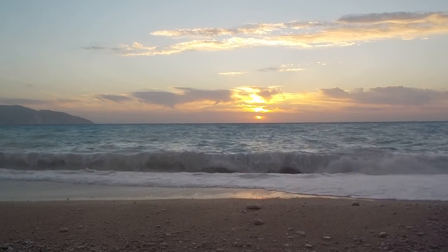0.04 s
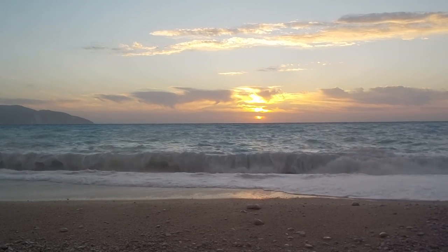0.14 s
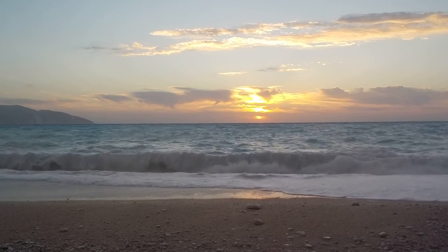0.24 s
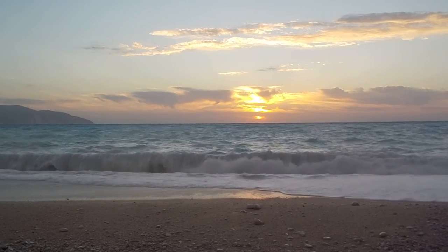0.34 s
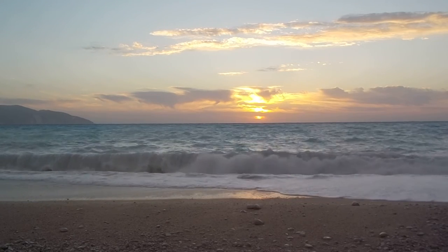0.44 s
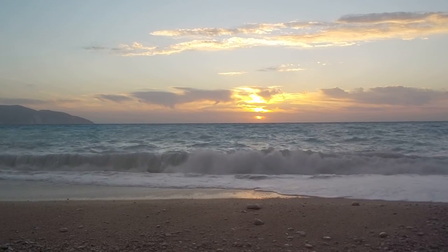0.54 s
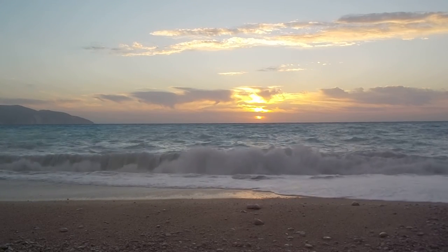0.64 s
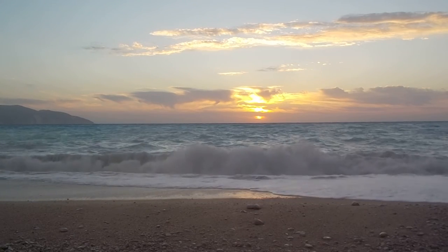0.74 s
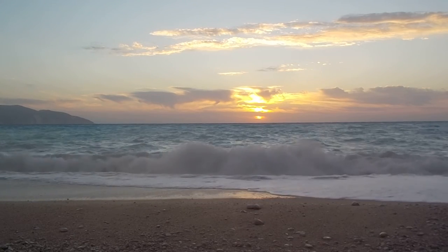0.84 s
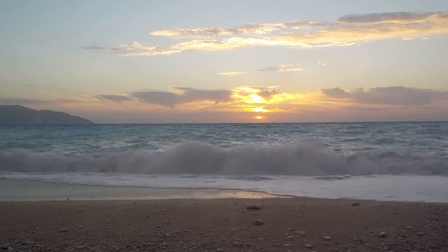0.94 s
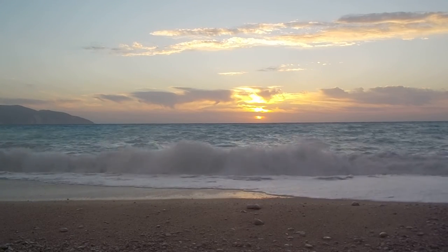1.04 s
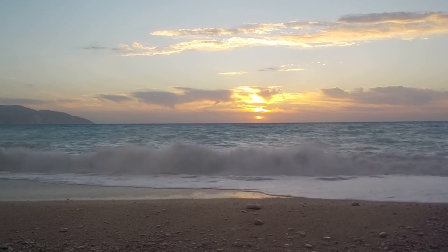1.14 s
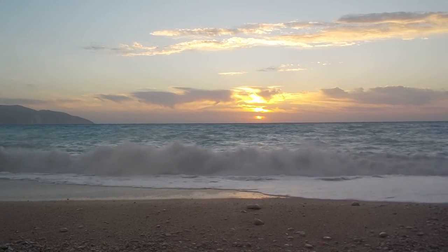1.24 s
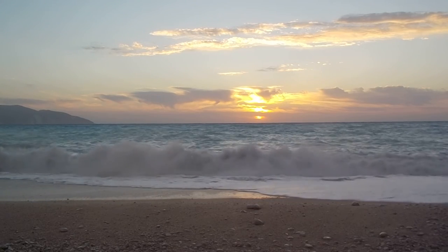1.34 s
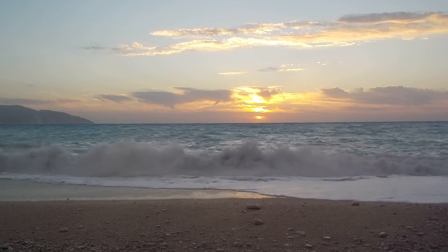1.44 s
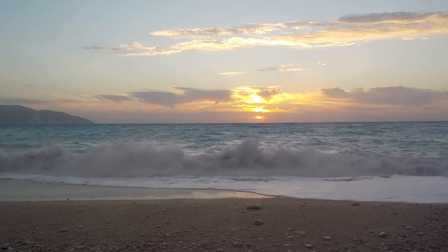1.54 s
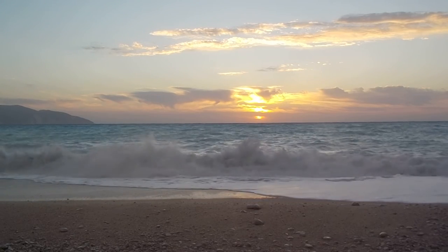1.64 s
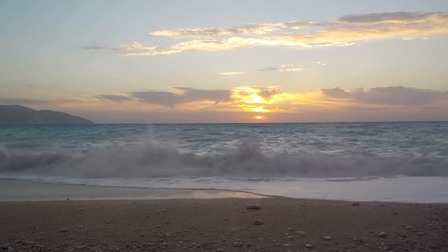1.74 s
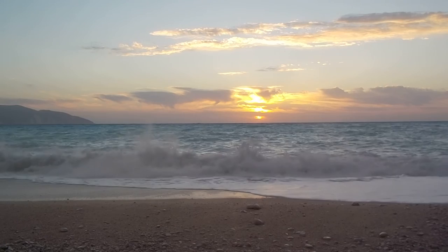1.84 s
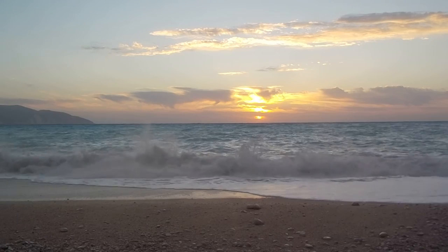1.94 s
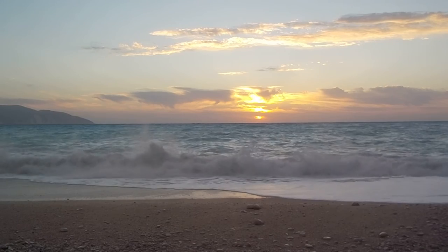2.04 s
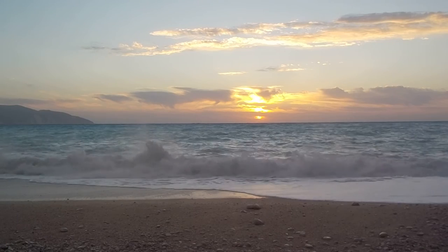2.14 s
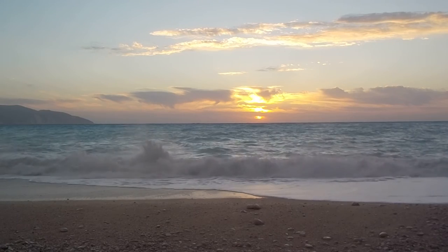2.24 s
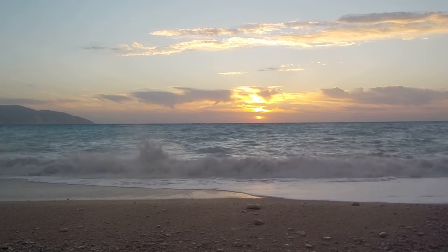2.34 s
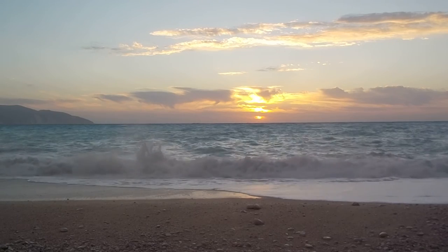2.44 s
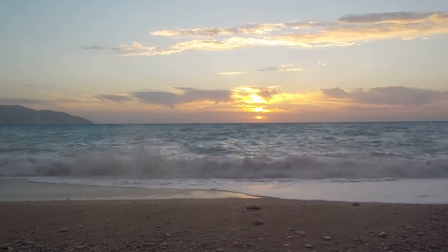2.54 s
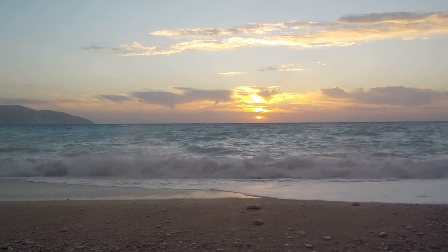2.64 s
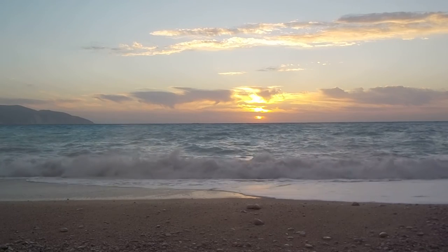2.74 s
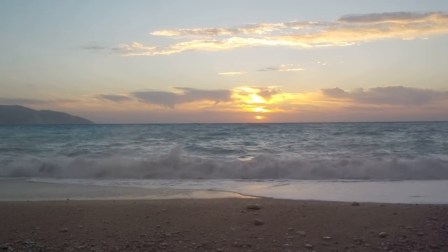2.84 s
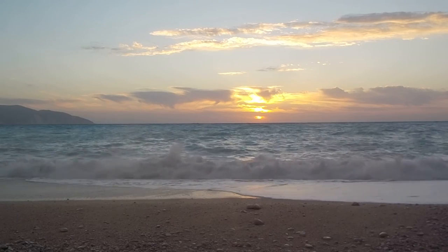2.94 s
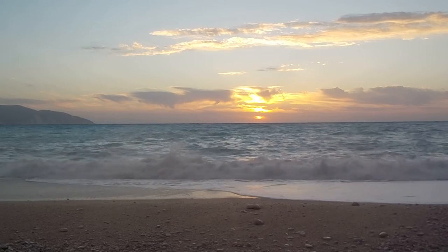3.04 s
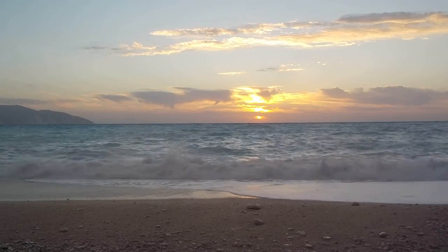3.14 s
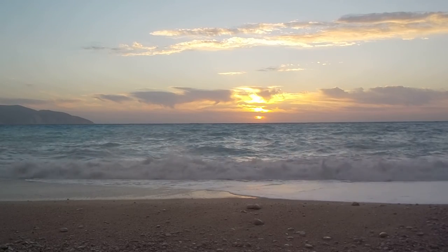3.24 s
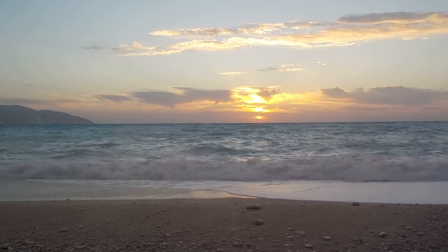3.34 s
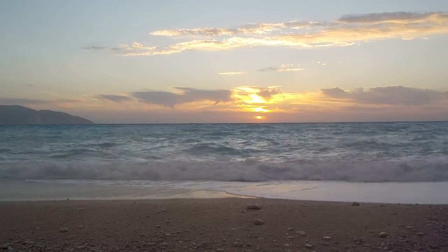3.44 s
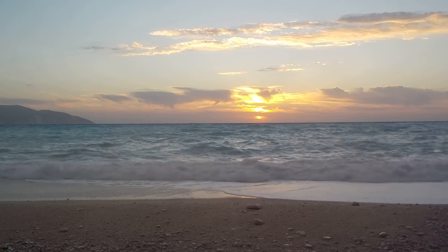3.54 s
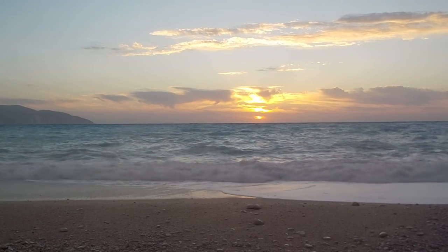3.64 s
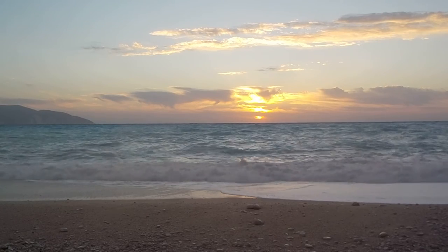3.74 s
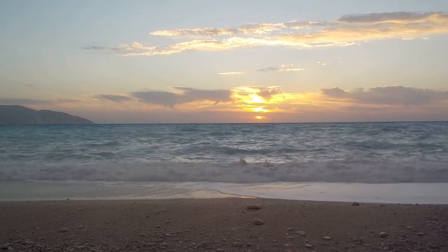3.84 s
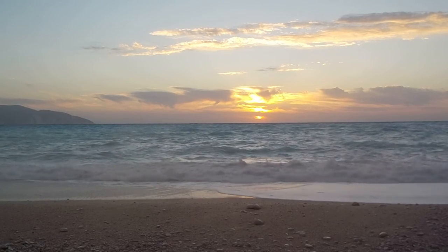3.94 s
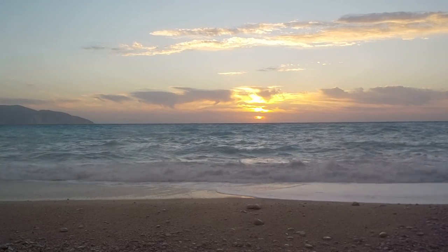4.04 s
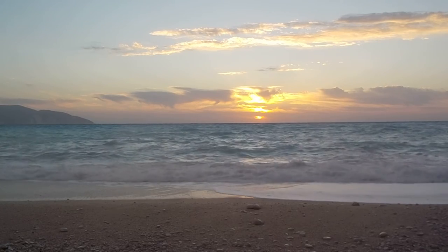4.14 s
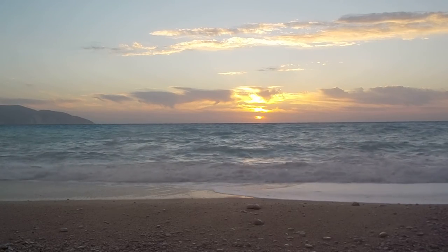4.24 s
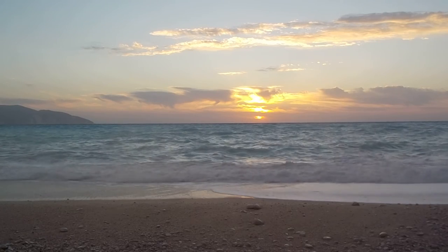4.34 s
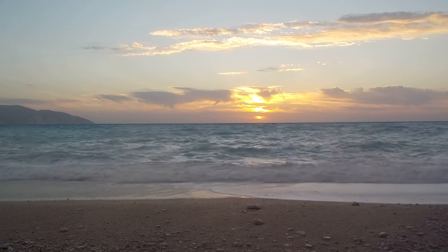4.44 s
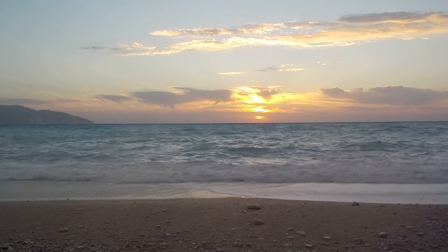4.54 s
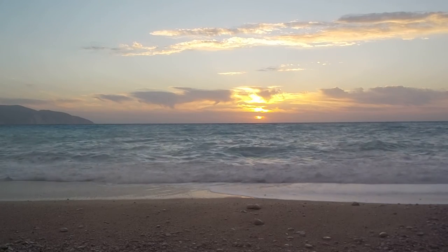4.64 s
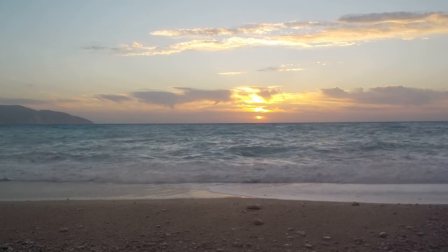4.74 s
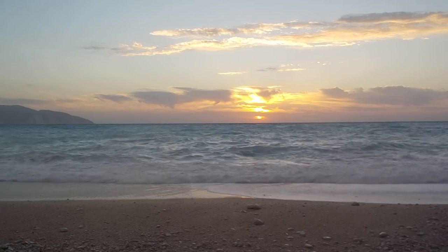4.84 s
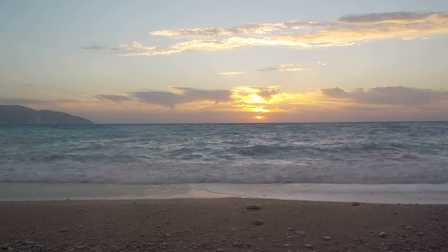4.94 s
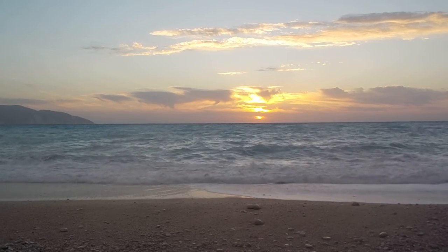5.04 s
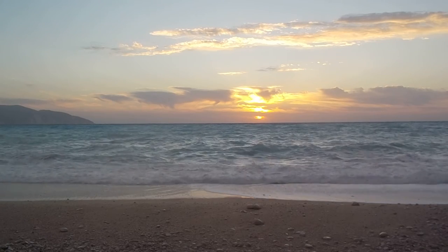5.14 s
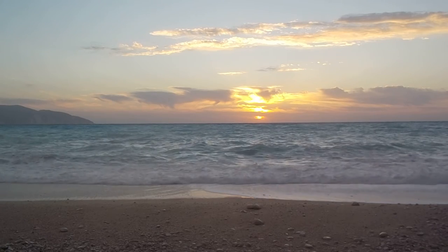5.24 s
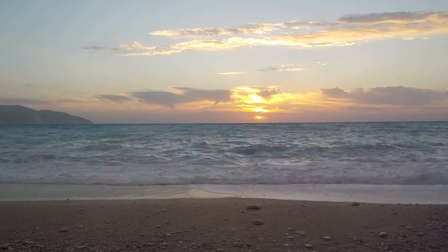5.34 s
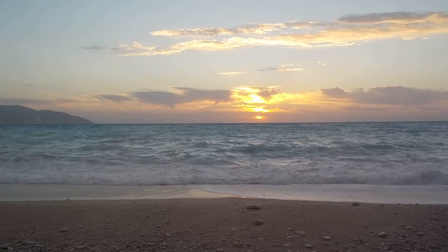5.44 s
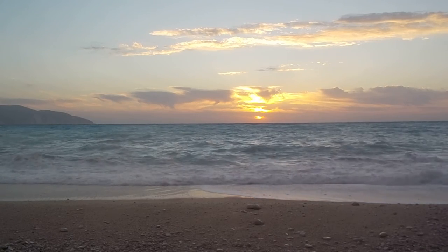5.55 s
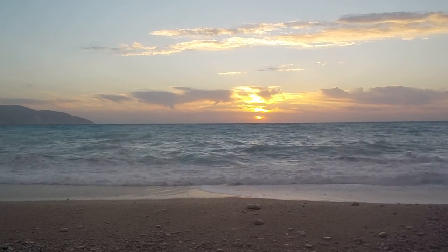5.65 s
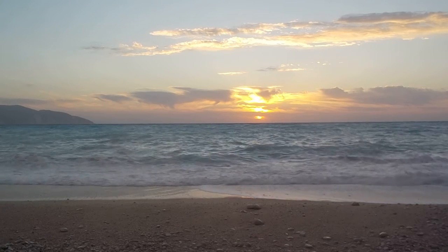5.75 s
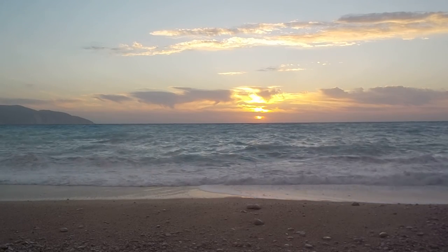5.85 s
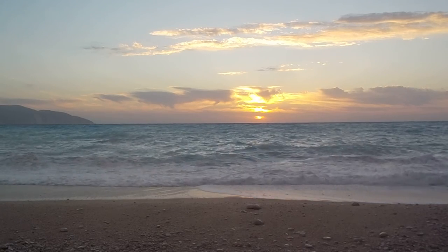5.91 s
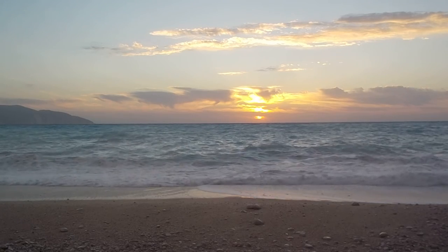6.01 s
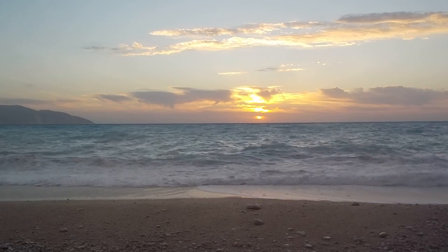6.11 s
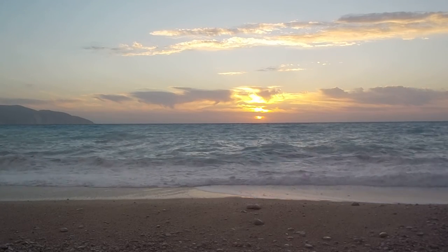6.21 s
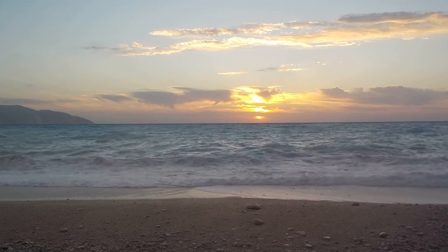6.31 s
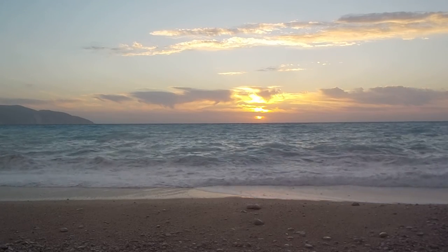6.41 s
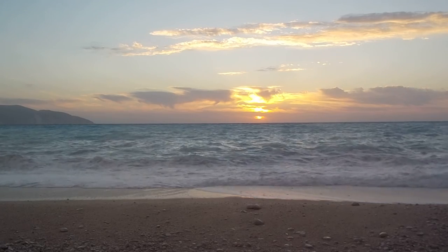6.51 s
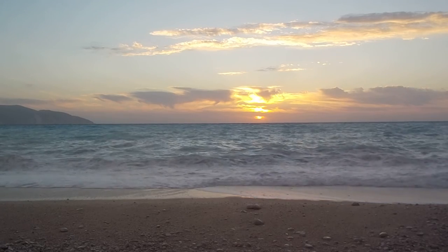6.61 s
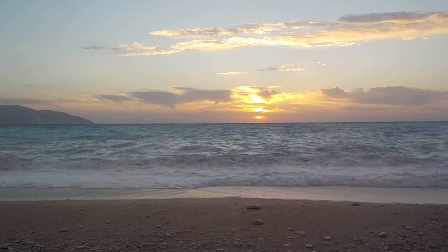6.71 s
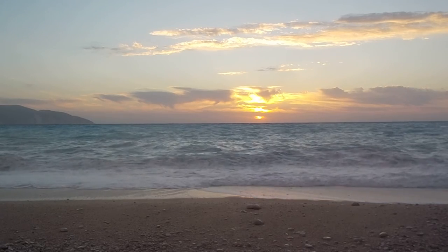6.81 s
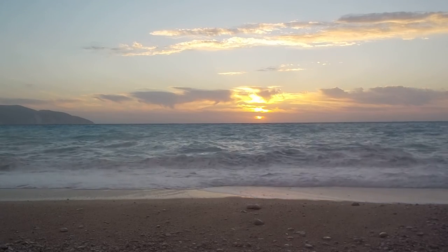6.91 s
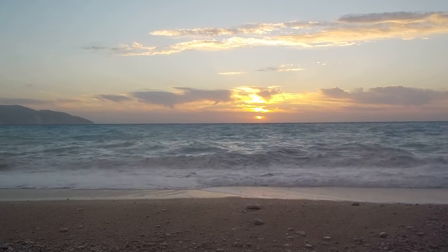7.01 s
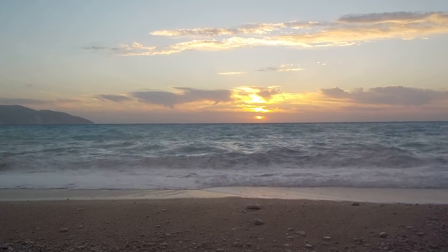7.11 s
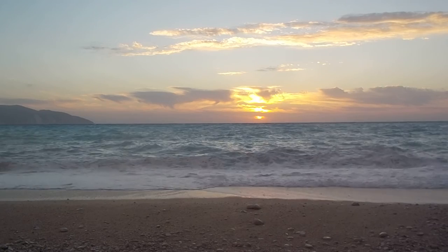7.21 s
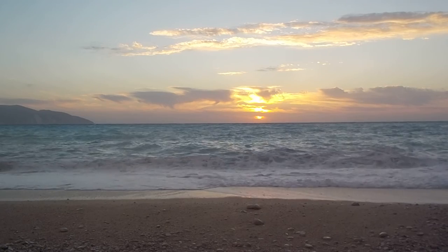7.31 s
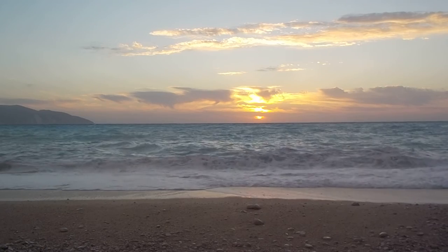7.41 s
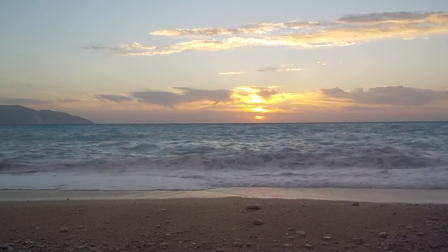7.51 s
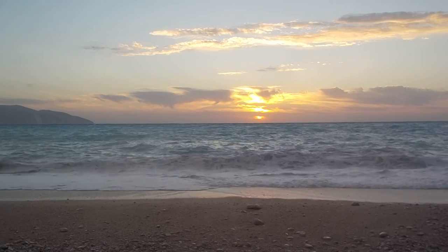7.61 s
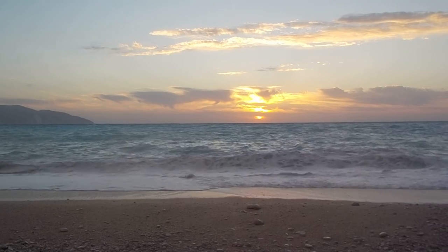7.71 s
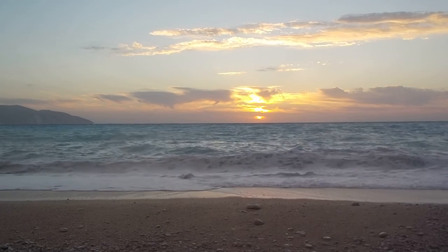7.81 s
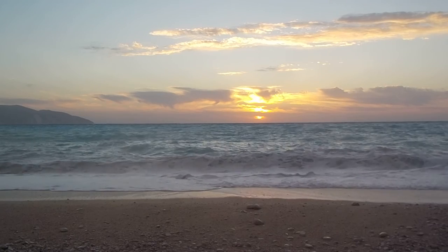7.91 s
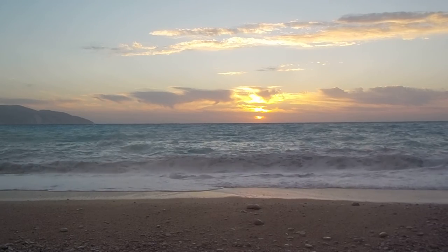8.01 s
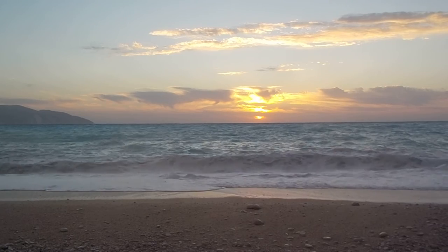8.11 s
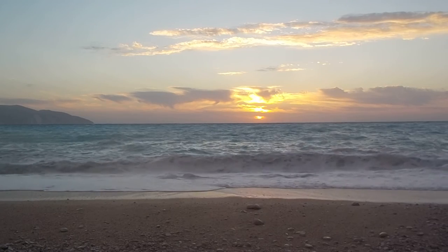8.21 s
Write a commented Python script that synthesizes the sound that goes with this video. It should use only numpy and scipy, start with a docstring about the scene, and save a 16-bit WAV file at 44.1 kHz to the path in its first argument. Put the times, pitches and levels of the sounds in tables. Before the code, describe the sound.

A wave breaks on a pebble beach with roaring, fizzing surf and rattling shingle, while hard wind gusts pop and flap on the microphone.

```python
"""A wave breaks on a pebble beach while hard gusts pop and flap on the two ports of a small camera.
Its churning water rumbles, bubbles ring and fizz, and knocking stones blur into a hiss.
From 1.3 s a second surge swells and dies away slowly, a third joins it, and softer gusts return around 3 to 5 s.
The rumble sinks near 5.7 s, then two smaller waves rake the shingle.
Water and stones are filtered noise, ringing clicks and dry clicks; the housing cuts notches into everything."""
import sys
import numpy as np
from scipy import signal
from scipy.fft import rfft, irfft, next_fast_len
from scipy.io import wavfile
from scipy.ndimage import uniform_filter1d

SR = 44100
rng = np.random.default_rng(int(sys.argv[2]) if len(sys.argv) > 2 else 0)


def dump_mix(stems):
    """Bounce the given channels to the path in sys.argv[1] as a 16-bit WAV at rate SR."""
    frames = np.atleast_2d(stems).T  # one column per channel
    limited = np.clip(frames, -1, 1)  # hard clip at full scale
    pcm = np.round(limited * 32767).astype(np.int16)
    wavfile.write(sys.argv[1], SR, pcm)


N = 364707


def from_db(db):
    """Decibels to gain."""
    return 10 ** (np.asarray(db) / 20)


def rms_one(x):
    """Scale to an rms of 1."""
    return x / np.sqrt(np.mean(x ** 2) + 1e-20)


def at_hz(points, hz, axis=1):
    """One column of a table, read on a log-frequency axis."""
    points = np.array(points)
    return np.interp(np.log(hz + 1e-9), np.log(points[:, 0]), points[:, axis])


def filtered(x, response):
    """Pass x through a response given as a function of Hz."""
    size = 2 * next_fast_len(N // 2 + 4096)
    hz = np.arange(size // 2 + 1) * SR / size
    return irfft(rfft(x, size) * response(hz), size)[..., :N]


def coloured(x, spectrum, axis=1):
    """Give x the tone colour of a spectrum table; rms 1."""
    return rms_one(filtered(x, lambda hz: from_db(at_hz(spectrum, hz, axis=axis))))


def drift(rate):
    """Smooth chance that changes about `rate` times a second; spread 1."""
    step = 40   # samples between the slow values
    settle = 2000   # slow values dropped while the filter settles
    r = np.exp(-2 * np.pi * rate * step / SR)
    noise = rng.standard_normal(N // step + settle + 2)
    slow = signal.lfilter([1], [1, -2 * r, r * r], noise)[settle:]
    return np.interp(np.arange(N) / step, np.arange(len(slow)), rms_one(slow))


def grains(per_s, spread_db):
    """Two unrelated streams of random clicks, many small and few large."""
    sizes = from_db(spread_db * np.minimum(rng.exponential(1, (2, N)), 5))
    signs = rng.choice([-1, 1], (2, N))
    return sizes * signs * (rng.random((2, N)) < per_s / SR)


# Gusts on the ports. Each row: start in seconds, end in seconds, left level in dB, right level in dB,
# before the wander and the mix trim.
GUST_TIMES = [(0.0, 0.035, -17.5, -22), (0.157, 0.193, -24.5, -29), (.385, .415, -23.5, -28),
              (.486, 0.511, -23, -22.5), (0.582, 0.622, -24.5, -31), (0.629, 0.691, -23, -25),
              (.704, 0.739, -23, -16.5), (.754, 0.786, -24, -18), (0.783, 0.803, -20.5, -18),
              (0.81, 0.857, -19.5, -16.5), (.862, 0.892, -23, -29), (0.898, 0.926, -26, -15),
              (1.062, 1.081, -21.5, -26), (1.091, 1.116, -16, -30), (1.125, 1.159, -24.5, -23),
              (1.283, 1.323, -26.5, -18), (1.329, 1.352, -32, -22), (1.923, 1.964, -31.5, -32),
              (2.827, 2.959, -48, -37.5), (3.038, 3.139, -36.5, -33), (3.488, 3.522, -41, -30.5),
              (3.726, 3.84, -28, -33.5), (3.856, 4.098, -32, -34.5), (4.12, 4.293, -31.5, -40),
              (4.295, 4.412, -27, -35), (4.418, 4.49, -30, -30.5), (4.493, 4.593, -41, -36.5),
              (4.596, 4.654, -29, -32), (5.082, 5.232, -41, -36)]
GUST_EDGE_SHARE = 0.065   # a gust builds and fades over this share of its length
GUST_SWING_DB, GUST_SWINGS_PER_S = 2.2, 29


def gust_force():
    """The push of the air on each port: short gusts snap in, long ones swell and fade, and all wander."""
    power, t = np.zeros((2, N)), np.arange(N) / SR
    for start, end, left_db, right_db in GUST_TIMES:
        edge_s = max(GUST_EDGE_SHARE * (end - start), 1e-3)
        blowing = np.maximum(np.tanh((t - start) / edge_s) - np.tanh((t - end) / edge_s), 0) / 2
        power += from_db([[left_db], [right_db]]) ** 2 * blowing
    wander = np.array([drift(GUST_SWINGS_PER_S), drift(GUST_SWINGS_PER_S)])
    return np.sqrt(power) * from_db(GUST_SWING_DB * wander)


# The ports' answer to turbulence. Each row: frequency in Hz, left and right relative level in dB.
BUFFET_COLOUR = [(25, -39, -23), (78, -37, -31), (140, -14, -9.5), (220, 1, 5), (500, 10, 10), (855, 3, 12),
                 (1127, 7, -10), (1480, -29, -27), (2520, -19, -39), (6000, -75, -65)]


def turbulence(soft_hz, flutter_db):
    """Eddies at each port, softened above soft_hz: fluttering, then evened out to a steady rms of 1."""
    left = coloured(rng.standard_normal(N), BUFFET_COLOUR, axis=1)
    right = coloured(rng.standard_normal(N), BUFFET_COLOUR, axis=2)
    softener = signal.butter(1, min(soft_hz, SR / 3), fs=SR, output="sos")
    eddies = signal.sosfilt(softener, np.array([left, right]))
    eddies = eddies * from_db(flutter_db * np.array([drift(85), drift(83)]))
    running_power = uniform_filter1d(eddies ** 2, size=SR // 45)
    return eddies / np.sqrt(running_power + 1e-12)


def wind(force, hard_db, level_db):
    """Each port has its own gusts: weak ones are dull, hard ones reach higher."""
    hard = force ** 2 / (force ** 2 + from_db(hard_db) ** 2)   # share of small, fast eddies
    bright = turbulence(soft_hz=3040, flutter_db=0.0)
    dull = turbulence(soft_hz=85, flutter_db=1.5)
    return from_db(level_db) * force * (np.sqrt(hard) * bright + np.sqrt(1 - hard) * dull)


def eddy(hz, length_s, lopsided, unsteady):
    """An eddy swings the air in each port for a few uneven cycles, harder one way, around its middle."""
    t = np.arange(-(SR // 50), SR // 50) / SR
    glide, turn = rng.standard_normal((2, 2, 1))   # random pitch glide and phase for each port
    along = t / max(length_s, 1e-3)
    pitch = hz * np.exp(unsteady * glide * np.tanh(along))
    swing = np.exp(-2 * along ** 2) * np.sin(2 * np.pi * (np.cumsum(pitch, axis=1) / SR + turn))
    return swing + lopsided * (swing ** 2 - np.exp(-4 * along ** 2) / 2)


# The hardest eddies pop or flap on a port. Each row: middle in seconds, left and right level in dB
# before trim, port filter and choking, pitch in Hz, length in seconds.
HARD_POPS = [(.006, -5, -18, 775, 0.004), (.0105, -15, -18, 1360, 0.0024), (0.013, -17, -4.5, 797, 0.0028),
             (0.0204, -15, -9, 712, 0.0054), (0.031, -4.5, -23, 977, 0.0025),
             (.036, -7.5, -26, 1148, 0.0016), (.0452, -11.5, -26, 694, 0.0027),
             (0.129, -6.5, -27, 600, 0.0011), (0.1463, -22, -6.5, 600, 0.0013),
             (0.17, -17, -24, 542, 0.0034), (0.182, -9, -26, 600, .0017), (.1896, -11, -25, 659, 0.0017),
             (0.392, -21, -26, 540, 0.0036), (0.397, -12, -23, 747, 0.001), (0.407, -9, -14, 583, 0.0017),
             (0.4094, 3.5, -26, 820, 0.0011), (0.4872, -11, -14, 723, .0017), (0.493, -10, -23, 771, 0.005),
             (0.4946, -12, -8, 746, .0017), (.5004, -15, -2, 701.5, 0.0023),
             (.5022, -17, -15, 1397, 0.0022), (.509, -9, -8, 654, 0.0018), (.5915, -7, -15, 900, 0.0031),
             (.5968, -6.5, -25, 827, 0.0026), (0.6157, -15, -7, 665, 0.002),
             (0.621, -6.5, -24, 806, 0.0033), (0.637, -12, -21, 500, 0.0026),
             (0.6487, -8, -12, 650, 0.0014), (.6516, -26, -2, 701, .0016), (0.678, -10, -19, 578, 0.0022),
             (0.6853, -4.5, -10, 704, 0.0012), (0.722, -23, -10, 597, 0.0038), (.7302, -5, -5, 600, 0.0018),
             (.76, -20, -7, 567, 0.0019), (0.7646, -27, -8, 455, 0.0022), (.7877, -8, -10, 426, 0.0042),
             (.7906, -11, -7.5, 564, 0.0052), (0.8034, -6, -18, 807, 0.002), (0.81, -4, -21, 563, 0.002),
             (0.817, -15, -9, 578, .0015), (0.824, -14, -11, 666, 0.0052), (.8344, -7, -5.5, 600, 0.0013),
             (.8405, -17, -18, 584, 0.0046), (.8443, -5, -10, 633, 0.0015),
             (0.8528, -8.5, -17, 655, 0.0029), (0.8553, -20, -2, 687, 0.0014), (0.871, -6, -13, 551, .0017),
             (0.896, -10, -15, 600, .0016), (0.9096, -3.5, -12, 694, 0.0023),
             (0.9157, -20, -2, 723, 0.0019), (.9238, -20, -14, 610, 0.0016), (0.954, -12, -33, 630, 0.0023),
             (1.0717, -11, -16, 825, 0.007), (1.0785, -11, -12, 630, 0.0032),
             (1.0858, 2.5, -24, 842, 0.0023), (1.101, -11, -25, 777, .0018), (1.1078, -1, -24, 868, 0.0022),
             (1.1232, -4, -23, 563, .0015), (1.1334, -19, -5, 713, 0.0012),
             (1.1394, -23, -1.5, 693, 0.0023), (1.143, -4, -25, 600, 0.0013), (1.148, -8, -7, 540, .0014),
             (1.15, -11, -18, 562, 0.0037), (1.163, -20, -8, 521, 0.0011), (1.294, -10, -6, 450, 0.0038),
             (1.302, -4, -10, 674, 0.0013), (1.3046, -17, 1, 525, 0.0021), (1.3063, -5, -1, 561, 0.0019),
             (1.3126, -15, -4, 407, 0.0036), (1.3168, -1, -10, 525, 0.0015), (1.3353, -26, -5, 565, 0.0021),
             (1.338, -12, -17, 583, .0016), (1.6777, -5.5, -21, 699, 0.0016),
             (1.9383, -14, -25, 586, 0.0036), (1.951, -2, -9, 627, 0.0014), (2.3654, -13, -32, 639, 0.0013),
             (3.1113, -15, -21, 750, .0014), (3.7358, -12, -28, 455, 0.0031),
             (3.746, -18, -23, 600, 0.0023), (3.7687, -10, -20, 584, 0.0019),
             (3.776, -19, -27, 900, 0.0013), (3.8155, -25, -10, 682, 0.0038), (3.8368, -23, -14, 660, .002),
             (3.8846, -19, -28, 577, .0025), (3.9919, -16, -23, 581, 0.0014), (4.028, -24, -17, 620, .002),
             (4.087, -9, -29, 480, 0.0019), (4.3169, -11.5, -27, 546, 0.0049),
             (4.3637, -12, -15, 381, .0026), (4.3714, -19, -14, 422, 0.0036), (4.384, -8, -29, 654, 0.0014),
             (4.416, -16, -23, 650, 0.002), (4.479, -27, -15, 540, 0.0016), (4.6054, -21, -35, 462, 0.004),
             (5.1225, -20, -16.5, 450, 0.0058), (5.1607, -21, -17, 570, .0022),
             (5.2, -12, -19, 645, 0.0016)]
EDDIES_PER_S, EDDY_HZ, EDDY_S = 19, 600, 0.0018   # rate, pitch and length of the lesser pops
EDDY_DB = 5.5   # lesser pops over the gust's push, before the port filter
POP_LOW_HZ, POP_HIGH_HZ = 170, 1450   # a port answers a sudden push only within this band


def pops(force, lopsided, unsteady, level_db):
    """Lesser eddies ride at random on the gusts; the hardest stand out, each with its own pitch and length."""
    signs = rng.choice([-1, 1], (2, N))
    hits = force * from_db(EDDY_DB) * signs * (rng.random((2, N)) < EDDIES_PER_S / SR)
    out = signal.oaconvolve(hits, eddy(EDDY_HZ, EDDY_S, lopsided, unsteady), "same", axes=1)
    for s, left_db, right_db, hz, length_s in HARD_POPS:
        gain = from_db(np.array([[left_db], [right_db]]) + level_db)
        push = gain * eddy(hz, length_s, lopsided, unsteady)
        at = int(s * SR) - push.shape[1] // 2
        out[:, max(at, 0):at + push.shape[1]] += push[:, max(-at, 0):]
    port_band = signal.butter(3, [POP_LOW_HZ, POP_HIGH_HZ], "band", fs=SR, output="sos")
    return signal.sosfilt(port_band, out)


def through_ports(air, bass_hz):
    """The narrow ports choke the hardest pushes and hold back deep bass and treble of the wind."""
    choked = 1.2 * np.tanh(air / 1.2)
    return signal.sosfilt(signal.butter(2, [bass_hz, 2600], "band", fs=SR, output="sos"), choked)


# Air whistling briefly, strongest on the right port. Each row: start in seconds, end in seconds,
# start, middle and end pitch in Hz, right peak level in dB.
WHISTLE_GLIDES = [(0.438, 0.459, 1230, 1230, 1440, -28), (0.531, 0.587, 1307, 1245, 1300, -30.5)]


def whistles(waver, left_db):
    """Air skims the edge of a port and sings for a moment, as a sine with a gliding, wavering pitch."""
    out, t = np.zeros(N), np.arange(N) / SR
    unsteady = 1 + waver * drift(60)
    for start, end, *pitches, level_db in WHISTLE_GLIDES:
        along = np.clip((t - start) / max(end - start, 1e-3), 0, 1)
        hz = np.interp(along, [0, .5, 1], pitches) * unsteady
        out += from_db(level_db) * np.sin(np.pi * along) * np.sin(2 * np.pi * np.cumsum(hz) / SR)
    return out * from_db([[left_db], [0]])


def swell(start, rise_s, hold_s, fall_s):
    """Power of one rush of water: it builds smoothly, holds and dies away."""
    t = np.arange(N) / SR - start
    built = np.sin(np.pi / 2 * np.clip(t / max(rise_s, 1e-3), 0, 1)) ** 2
    return built * np.exp(-2 * np.maximum(t - rise_s - hold_s, 0) / max(fall_s, 1e-3))


def over_rest(rest_db, swells):
    """Level in dB of (dB, swell) pairs on top of a steady rest level."""
    return 10 * np.log10(from_db(rest_db) ** 2 + sum(from_db(db) ** 2 * power for db, power in swells))


# Surges of white water. Each row: start, rise, hold and fall in seconds, then churn, bubble wash
# and foam fizz level in dB before the mix trims.
WATER_SURGES = [(-.02, 0.21, 1.04, 1.1, -38.5, -35, -44.5), (1.267, 0.38, 0.73, 4.1, -43.5, -30, -58),
                (2.404, 1.24, 0.25, 0.52, -44.5, -35.5, -45), (6.0, 0.59, 0.19, 1.6, -47.5, -48.5, -59),
                (7.6, 0.46, .3, 0.6, -47, -45.5, -67)]
# Water throws the stones (bright) or drags them (dull). Each row: start, rise, hold and fall in seconds,
# level in dB before the mix trim, treble lift in dB.
STONE_DRAGS = [(-.2, 0.45, .8, 0.65, -35.5, -0.5), (0.989, 0.54, 0.13, 1.81, -34, 1.5),
               (4.452, 0.45, 0.35, 0.86, -44.5, -10), (6.04, 0.36, 0.25, 0.23, -42.7, -5.5),
               (7.153, 0.77, 0.14, 0.35, -40.5, -1.8)]
FOAM_LINGERS_S = 0.92   # the foam fizzes on after its surge has spent itself
SEA_CHURN_DB, SEA_WASH_DB, SEA_FIZZ_DB = -71, -53.5, -50   # rest of the shore, before the mix trims
STONES_REST_DB = -46   # the stones never lie quite still; before the mix trim
LULL_S, LULL_HALF_S, LULL_DB = 5.74, 0.2, -4   # the rumble sinks between two waves


def surf_levels():
    """Levels of churn, wash, fizz and shingle in dB as the surges come and go."""
    churning, washing, fizzing = [], [], []
    for start, rise_s, hold_s, fall_s, churn_db, wash_db, fizz_db in WATER_SURGES:
        surge = swell(start, rise_s, hold_s, fall_s)
        churning.append((churn_db, surge))
        washing.append((wash_db, surge))
        fizzing.append((fizz_db, swell(start, rise_s, hold_s + FOAM_LINGERS_S, fall_s)))
    dragging = [(db, swell(*shape)) for *shape, db, _ in STONE_DRAGS]
    lull_db = LULL_DB * np.exp(-((np.arange(N) / SR - LULL_S) / LULL_HALF_S) ** 2)
    return (over_rest(SEA_CHURN_DB, churning) + lull_db, over_rest(SEA_WASH_DB, washing),
            over_rest(SEA_FIZZ_DB, fizzing), over_rest(STONES_REST_DB, dragging))


# Colour of the knocking stones. Each row: frequency in Hz, relative level in dB.
SHINGLE_COLOUR = [(1600, -37), (2500, -10.5), (3200, 3.5), (4000, -3), (4900, -9), (5900, -15), (6800, -26),
                  (9600, -30), (10800, -29), (12200, -38), (15500, -43)]


def shingle(level_db, knocks_per_s, spread_db, surge_db):
    """Stones knock together; the harder the water drags, the more of them move."""
    below_peak_db = level_db - level_db.max()
    knocks = grains(knocks_per_s * from_db(below_peak_db), spread_db)
    each_db = (level_db + level_db.max()) / 2   # half of the swell is more knocks, half is harder ones
    crowd = np.sqrt(np.mean(from_db(below_peak_db)))   # average knocking against its busiest moment
    return from_db(each_db + surge_db * drift(8.1)) * crowd * coloured(knocks, SHINGLE_COLOUR)


TREBLE_HZ = 4100   # the sharper knocks lie above this


def sharpened(stones, level_db):
    """Each throw or drag sets the sharpness of the knocks by its share of the rattle."""
    lift_db = sum(treble_db * from_db(db - level_db) ** 2 * swell(*shape)
                  for *shape, db, treble_db in STONE_DRAGS)
    treble = filtered(stones, lambda hz: hz ** 8 / (hz ** 8 + TREBLE_HZ ** 8))
    return stones + (from_db(lift_db) - 1) * treble


def bubbles(per_s, spread_db, low_hz, high_hz, cycles, patchy_db, count=24):
    """Bubbles of many sizes ring as they form, fading 60 dB in `cycles` cycles; each size comes in clouds."""
    clicks = grains(per_s, spread_db)
    dealt = rng.integers(0, count, N)   # which bubble size each moment belongs to
    out = 0
    for k, hz in enumerate(np.geomspace(low_hz, high_hz, count)):
        r, w = from_db(-60 * hz / (cycles * SR)), 2 * np.pi * hz / SR
        cloud = from_db(patchy_db * drift(3.1)) * (dealt == k)
        ring = signal.lfilter([1, 0, -1], [1, -2 * r * np.cos(w), r * r], clicks * cloud + 1e-18)
        out = out + ring * np.sqrt(hz)
    return rms_one(out)


# Colour of the foam. Each row: frequency in Hz, relative level in dB.
FIZZ_COLOUR = [(900, -34), (1350, -5), (1650, 3), (2100, 7.5), (2500, 0.5), (3200, -1.5), (5000, -52.5)]


def fizz(level_db):
    """Small bubbles ring in the sheet of foam."""
    cloud = bubbles(per_s=14000, spread_db=1.2, low_hz=1020, high_hz=3760, cycles=8.1,
                    patchy_db=1.75, count=12)
    return from_db(level_db) * coloured(cloud, FIZZ_COLOUR)


# Colour of the rumble. Each row: frequency in Hz, relative level in dB.
CHURN_COLOUR = [(30, -54), (65, -36), (110, -23.5), (200, -11.5), (310, -4.5), (430, 0.5), (620, -7.5),
                (1100, -42.5)]


def churn(level_db, lumpy_db):
    """The tumbling mass of water and air rumbles in lumps."""
    lumps_db = lumpy_db * drift(11.0)
    return from_db(level_db + lumps_db) * coloured(rng.standard_normal((2, N)), CHURN_COLOUR)


# Colour of the roar. Each row: frequency in Hz, relative level in dB.
WASH_COLOUR = [(250, -26.5), (450, -9.5), (620, -4), (800, -1.65), (1100, 1), (1280, -9), (1600, -9),
               (2600, -53)]


def wash(level_db):
    """Larger bubbles in the rolling white water make the body of the roar."""
    cloud = bubbles(per_s=14000, spread_db=0.96, low_hz=299.4, high_hz=1816, cycles=11.4, patchy_db=0.97)
    return from_db(level_db + .5 * drift(24)) * coloured(cloud, WASH_COLOUR)


# Right port against left, for sound from the sea. Each row: frequency in Hz, level in dB,
# phase lag in radians.
RIGHT_PORT = [(60, 5.4, 0.33), (220, 3.0, 0.2), (420, -0.3, 0.35), (560, 2.0, .25), (700, 4.1, .42),
              (840, 5.9, 0.85), (960, -2.5, 1.8), (1100, -9.5, 0.7), (1200, -3, .05), (1300, 1.9, 0.5),
              (1400, -2.0, .95), (1530, -0.6, 0.72), (1700, 0, 1.5), (1860, 2.5, 0.45), (2030, -1.5, 1.4),
              (2130, -7, 1.9), (2230, -13.5, 0.9), (2700, -10.8, 0.3), (3250, -13.2, -0.42),
              (3900, -6.4, -0.67), (4250, -7, -.65), (4900, -1.7, -0.45), (5400, -1.5, -0.01),
              (6100, -4.5, -0.23), (7000, -2.2, -0.15), (9500, -4.8, -0.25)]
# How alike the sea is at both ports. Each row: frequency in Hz, coherence from 0 to 1.
PORT_LIKENESS = [(90, 0.2), (250, 0.88), (450, 0.98), (800, 0.97), (1600, 0.99), (2200, 0.81), (4000, 0.94),
                 (6200, 0.81), (10000, 0.47)]


def at_ports(pair):
    """The shore is wide, so the ports share only part of its sound; the right has its own colour and lag."""
    def alike(hz):
        """Coherence of the ports at each frequency."""
        return np.clip(at_hz(PORT_LIKENESS, hz), 0, 1)

    def right_port(hz):
        """Gain and phase lag of the right port."""
        return from_db(at_hz(RIGHT_PORT, hz)) * np.exp(-1j * at_hz(RIGHT_PORT, hz, axis=2))

    shared = filtered(pair[0], lambda hz: np.sqrt((1 + alike(hz)) / 2))
    apart = filtered(pair[1], lambda hz: np.sqrt((1 - alike(hz)) / 2))
    return np.array([shared + apart, filtered(shared - apart, right_port)])


def scene():
    """The surf at both ports, with the wind on top."""
    churn_db, wash_db, fizz_db, shingle_db = surf_levels()
    water = churn(churn_db - .9, lumpy_db=2.04) + wash(wash_db - .5) + fizz(fizz_db + 3.0)
    stones = shingle(shingle_db + 0.5, knocks_per_s=30000, spread_db=1.0, surge_db=0.63)
    force = gust_force()
    air = wind(force, hard_db=-25.5, level_db=-0.5)
    air = air + pops(force, lopsided=0.4, unsteady=0.2195, level_db=-2.22)
    surf = at_ports(water + sharpened(stones, shingle_db))
    return surf + through_ports(air, bass_hz=92) + whistles(waver=0.014, left_db=-11.0)


# Notches of the housing. Each row: frequency in Hz, width in Hz, share that leaks through.
HOUSING_NOTCHES = [(1760, 125, .1), (1780, 125, .1), (2540, 420, .12), (2555, 320, .11), (4976, 155, .08)]
# One wide band that the housing shuts out: low edge in Hz, high edge in Hz.
SHUT_BAND_HZ = (7200, 8380)
SELF_NOISE_DB = -62   # before the housing filters
CUTOFF_HZ = 15700


def record(dry):
    """The microphones add a faint hiss, the housing cuts its notches, the top is cut off."""
    out = dry + from_db(SELF_NOISE_DB) * rng.standard_normal((2, N))
    for hz, width_hz, leak in HOUSING_NOTCHES:
        notched = signal.lfilter(*signal.iirnotch(hz, hz / width_hz, fs=SR), out)
        out = leak * out + (1 - leak) * notched
    out = signal.sosfilt(signal.cheby2(4, 28, SHUT_BAND_HZ, "stop", fs=SR, output="sos"), out)
    return signal.sosfilt(signal.ellip(12, .1, 90, CUTOFF_HZ, fs=SR, output="sos"), out)


dry = scene()
out = record(dry)
dump_mix(out)
```